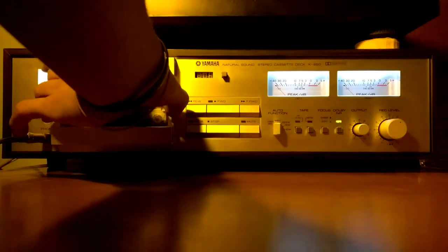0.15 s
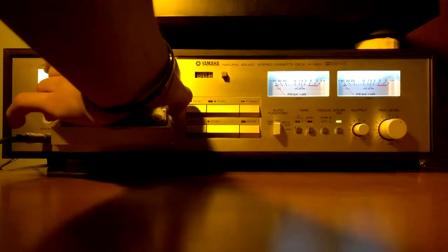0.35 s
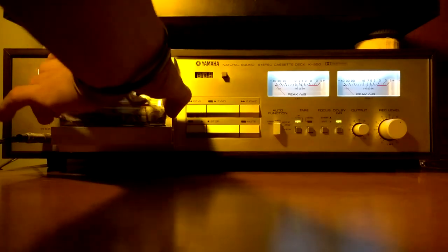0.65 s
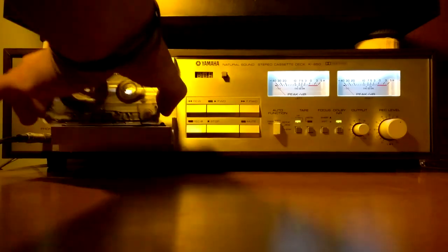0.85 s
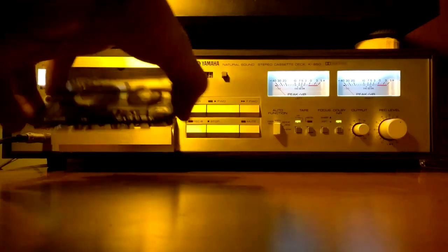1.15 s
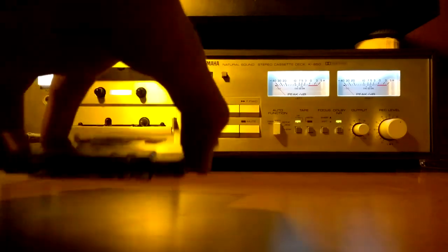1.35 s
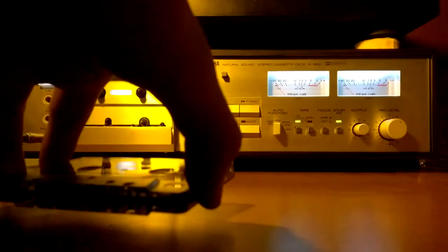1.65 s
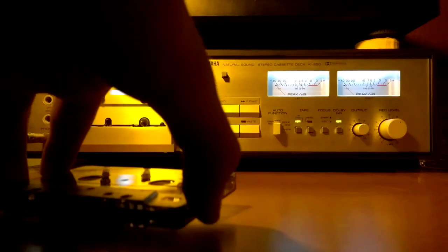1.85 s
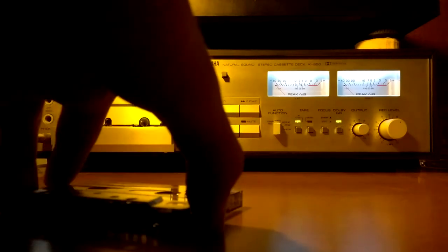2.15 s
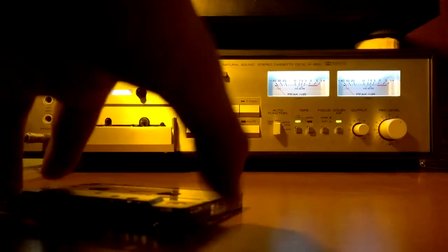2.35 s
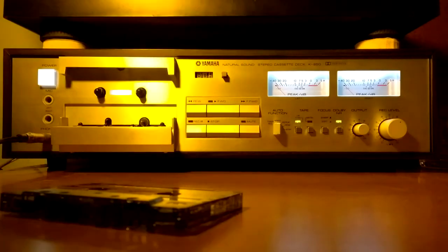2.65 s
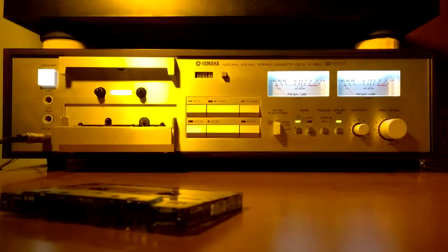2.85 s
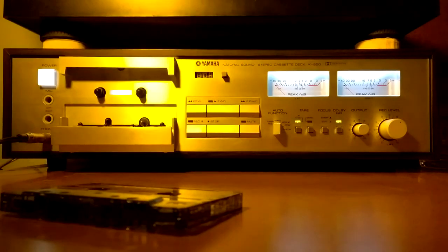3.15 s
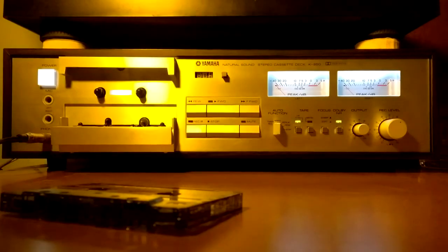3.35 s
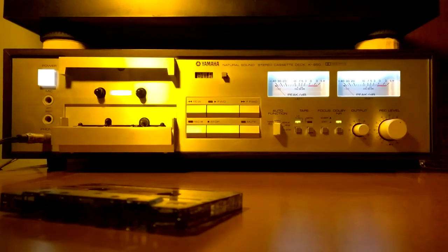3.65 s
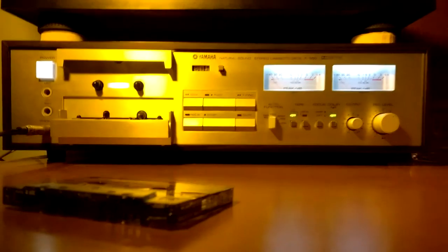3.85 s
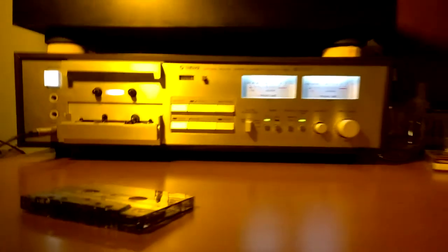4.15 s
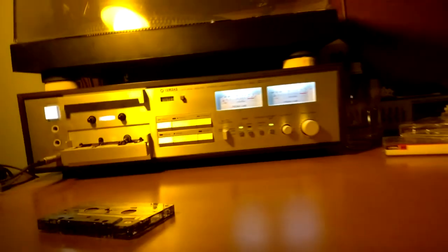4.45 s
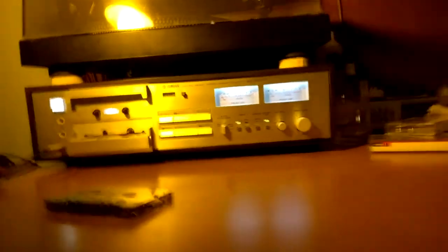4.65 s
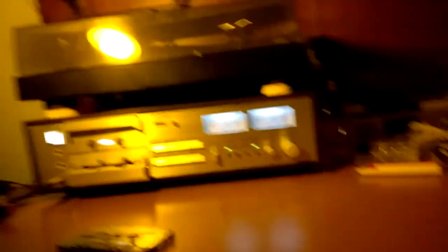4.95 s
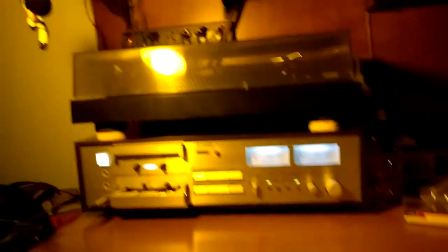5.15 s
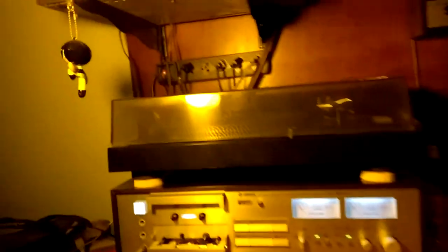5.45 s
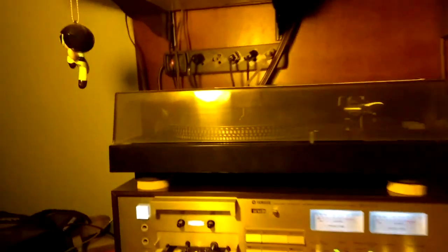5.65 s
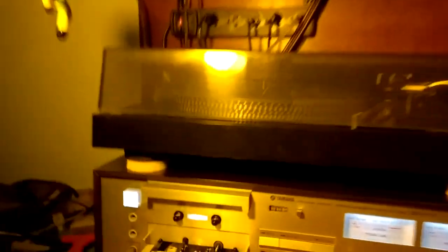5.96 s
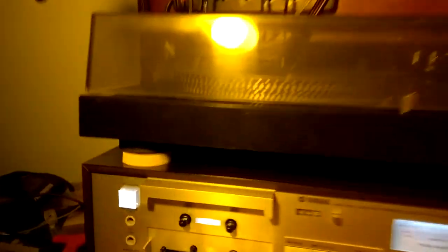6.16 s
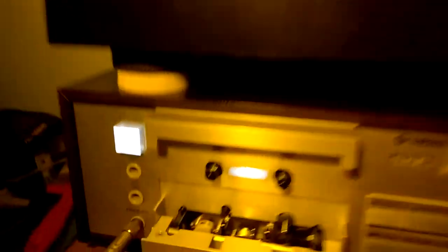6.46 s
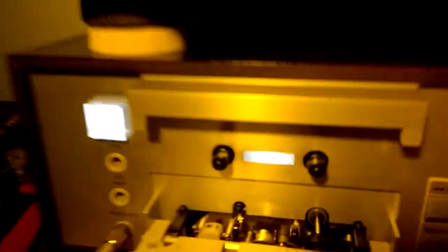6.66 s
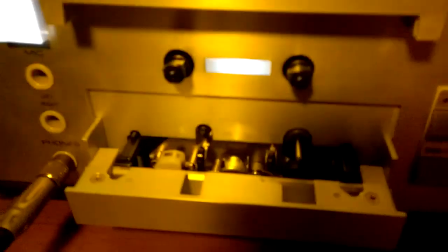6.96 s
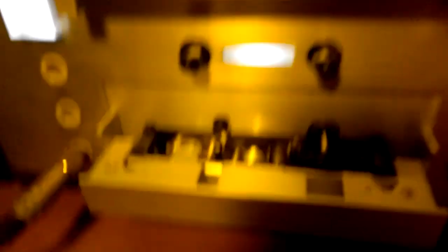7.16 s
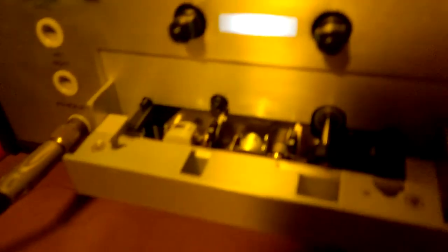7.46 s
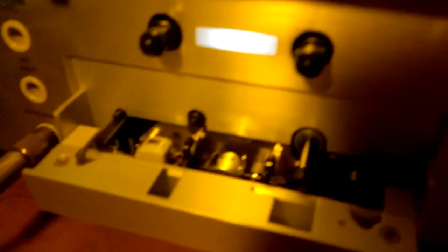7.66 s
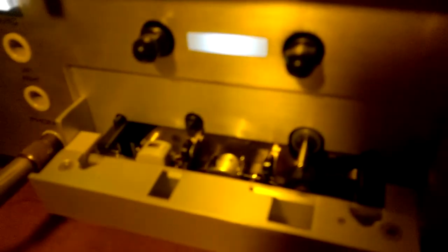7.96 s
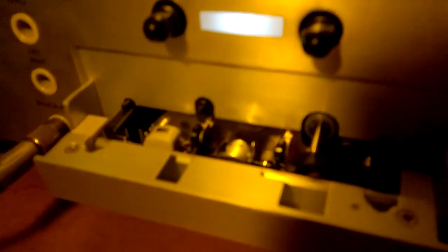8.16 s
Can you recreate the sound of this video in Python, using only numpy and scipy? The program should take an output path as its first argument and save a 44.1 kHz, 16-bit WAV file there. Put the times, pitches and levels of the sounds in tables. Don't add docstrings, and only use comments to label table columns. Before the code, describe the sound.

In a quiet small room, a plastic cassette clicks, scrapes and rattles out of a tape deck, then lands softly on a wooden table. A low engine drones faintly outside, quickens and disappears. Then fingers handle the recording phone: bassy thumps, dry rubs, sharp case cracks and one short squeak, very close and almost entirely in the right channel, fading to faint rustle.

```python
import sys
import numpy as np
from scipy import signal
from scipy.io import wavfile

SR = 44100
rng = np.random.default_rng(int(sys.argv[2]) if len(sys.argv) > 2 else 0)


def master(y):
    cut = np.clip(np.atleast_2d(y).T, -1, 1)
    pcm = np.round(cut * 32767)
    wavfile.write(sys.argv[1], SR, pcm.astype(np.int16))


def attenuation_scalar(level_db):
    decades = np.asarray(level_db, float) / 20
    return 10 ** decades


N = 365721


def rms_one(x):
    return x / np.sqrt(np.mean(x ** 2) + 1e-20)


def peak_one(x):
    return x / np.abs(x).max()


def add(out, start_s, x):
    at = round(start_s * SR)
    out[..., at:at + x.shape[-1]] += x[..., :N - at]


def in_time(rows, edge_db=None):
    time_s, *columns = np.transpose(rows)
    return [np.interp(np.arange(N) / SR, time_s, c, edge_db, edge_db) for c in columns]


def band(x, low_hz, high_hz, order=2):
    edges_hz = [low_hz, min(high_hz, .45 * SR)]
    return signal.sosfilt(signal.butter(order, edges_hz, "band", fs=SR, output="sos"), x)


def drift(rate_hz):
    r = np.exp(-2 * np.pi * rate_hz / SR)
    settle = SR // 4
    white = rng.standard_normal(N + settle)
    return rms_one(signal.lfilter([1], [1, -2 * r, r * r], white)[settle:])


def ring(x, hz, t60_s):
    r = attenuation_scalar(-60 / (max(t60_s, .002) * SR))
    w = 2 * np.pi * hz / SR
    return signal.lfilter([0, np.sin(w)], [1, -2 * r * np.cos(w), r * r], x + 1e-18)


def body(x, modes, spread_db=0):
    lucky_db = spread_db * rng.standard_normal(len(modes))
    out = 0
    for k, (hz, width_hz, db) in enumerate(modes):
        t60_s = np.log(1000) / np.pi / width_hz
        out = out + (-1) ** k * attenuation_scalar(db + lucky_db[k]) * ring(x, hz, t60_s)
    return out


def grains(shape, per_s, spread_db):
    sizes = attenuation_scalar(spread_db * np.minimum(rng.exponential(1, shape), 4)) * rng.choice([-1, 1], shape)
    return sizes * (rng.random(shape) < per_s / SR)


def gestures(start_s, hold_s, db, rise_db_per_s, fall_db_per_s):
    t = np.arange(0, N / SR + .002, .001)
    start_s, hold_s = start_s[:, None], hold_s[:, None]
    away_db = np.maximum(rise_db_per_s * (start_s - t), fall_db_per_s * (t - start_s - hold_s))
    return attenuation_scalar(db[:, None] - np.clip(away_db, 0, 200))


def per_sample(slow):
    return np.interp(np.arange(N) / SR * 1000, np.arange(len(slow)), slow)


def together(rows):
    return per_sample(np.sqrt(np.sum(rows ** 2, axis=0)))


def two_ports(right, other, left_db, alike=.7):
    alike = np.clip(alike, 0, 1)
    late = np.roll(right, 20, axis=-1)
    left = alike * late + np.sqrt(1 - alike ** 2) * other
    return 2 * np.array([left * attenuation_scalar(left_db), right]) / np.sqrt(1 + attenuation_scalar(left_db) ** 2)


# pitch_hz, level_db (per Hz)
ROOM_TONE = [(20, -8.5), (48, -5), (154, -26.5), (698, -33.5), (1370, -47.5), (5850, -50.5), (8410, -60.5),
             (15000, -52.5)]
# pitch_hz, likeness (0 to 1)
LIKENESS = [(60, 0.82), (300, 0.023), (650, 0.18), (3000, 0.018)]


def room_tone():
    out = 0
    edges_hz = 18 * 2 ** np.arange(0, 10.5, .5)
    white = rng.standard_normal((2, 2, N))
    for k, (low_hz, high_hz) in enumerate(zip(edges_hz, edges_hz[1:])):
        mid, side = band(white[k % 2], low_hz, high_hz)
        at = np.log(low_hz * high_hz) / 2
        level_db, alike = (np.interp(at, np.log(np.array(p)[:, 0]), np.array(p)[:, 1])
                           for p in (ROOM_TONE, LIKENESS))
        alike = np.clip(alike, -1, 1)
        out = out + attenuation_scalar(level_db) * (np.sqrt(1 + alike) * mid + np.sqrt(1 - alike) * side * [[1], [-1]])
    return attenuation_scalar(-56) * rms_one(out)


# time_s, firing_hz
ENGINE = [
    (0.0, 48.96),
    (1.1, 53.24),
    (2.2, 57.53),
    (3.4, 60.16),
]
# start_s, hold_s, level_db
FIRING_BOOMS = [
    (0.0, 0.15, -51.5),
    (.42, 0.7, -34.5),
    (1.45, 0.844, -52.5),
    (2.82, 0.23, -50),
]
# start_s, hold_s, level_db
SECOND_BOOMS = [
    (0.0, 1.6, -59.5),
    (1.17, 1.233, -57.5),
]
# start_s, hold_s, level_db
HALF_BOOMS = [
    (.95, 0.53, -50.5),
    (2.2, 0.54, -57),
]


def engine():
    firing_hz, = in_time(ENGINE)
    firing, second, half = (together(gestures(*np.transpose(booms), 92.5, 92.5))
                            for booms in (FIRING_BOOMS, SECOND_BOOMS, HALF_BOOMS))
    turn = 2 * np.pi * np.cumsum(firing_hz * (1 + 0.0012 * drift(11.0))) / SR
    leaving = np.interp(np.arange(N) / SR, [3.2, 3.45], [1, 0])
    white = rng.standard_normal(N)
    out = attenuation_scalar(-67.0) * rms_one(band(white, 35, 140.0))
    out = out + attenuation_scalar(-31.5) * firing * rms_one(band(white, 200, 300))
    for order, gain in [(1, firing), (2, second), (.5, half), (4, second / 10), (5, second / 10)]:
        out = out + np.sqrt(2) * gain * attenuation_scalar(0.5 * drift(12.0)) * np.sin(order * turn)
    return leaving * out


# pitch_hz, level_db
SHELL = [(2300, -6), (2850, -5.5), (3600, -1), (4150, 1.5), (4600, 0), (5600, -2), (6500, 1.5),
         (7150, -0.5), (8400, -4.5), (9500, -4.5), (11000, -8), (13000, -14)]


def shell(contact):
    detune = attenuation_scalar(.25 * rng.standard_normal(len(SHELL)))
    mix = attenuation_scalar(2.5 * rng.standard_normal((len(SHELL), 2, 1)))
    mix[:, 1] *= np.sign(np.roll(detune, 1) - 1)[:, None]
    return sum((-1) ** k * attenuation_scalar(db) * mix[k] * ring(contact, hz * detune[k], 13.0 / hz)
               for k, (hz, db) in enumerate(SHELL))


def cassette_hit(below, hz, bright_db, low_db):
    t = np.arange(SR // 7) / SR
    force = (1 - np.exp(-(t + 0.00011) / 0.00062)) * (np.exp(-t / 0.003) + 0.07 * np.exp(-t / 0.025))
    contact = grains(len(t), 3500, 3.5) * force
    contact[12] = 1.3
    main = ring(contact, hz, 0.016)
    main = main + 0.9 * ring(contact, 1.17 * hz, .01) - .6 * ring(contact, .88 * hz, 0.01)
    strength, detune = attenuation_scalar([[2.5], [.25]] * rng.standard_normal((2, len(below))))
    low = sum(g * ring(contact, f * d, t60_s) for g, d, (f, t60_s) in zip(strength, detune, below))
    bright = peak_one(shell(contact)) * attenuation_scalar([[0], [2.0]])
    return peak_one(main) + attenuation_scalar(bright_db) * bright + attenuation_scalar(low_db) * peak_one(low)


# start_s, peak_db, shell_hz, bright_db, low_db (last two against the peak)
PULL = [(0.0553, -37.5, 1620, 5, -3.5), (0.2253, -49.5, 1770, 4.5, -7), (0.2885, -40.5, 1250, -9, -8.5),
        (0.3277, -33.5, 1450, -24, -13), (0.342, -35, 1481, -24.5, -14), (0.3657, -42, 1440, 3, -12),
        (0.3826, -31, 1540, -4, -14.5), (0.394, -26, 1500, -14, -19), (0.3986, -19, 1355, -44.5, -15.5),
        (0.4012, -17.5, 1420, 5, -14.5), (0.41, -38.5, 1500, 4, 1), (0.418, -30, 1330, 2.5, 4.5),
        (0.4817, -17, 1390, 0, -12.5), (0.4862, -17, 1770, -7, -11.5), (0.4885, -15, 1660, -1.5, -15.5),
        (0.4945, -28.5, 1780, -14, 3.5), (0.5035, -24, 1500, -5, 1), (0.5108, -37, 1600, -22.5, -5),
        (0.5328, -35.5, 1700, 2, -14.5), (0.539, -35.5, 1920, 1.5, -9.5), (0.5847, -35, 1790, -19.5, -21),
        (0.5897, -24, 1440, 3, -8), (0.5955, -20, 1660, 4.5, -9), (0.6, -26, 1880, 2, -2.5),
        (0.606, -19.5, 1470, -15, -29), (0.624, -37.5, 1580, 1.5, -11), (0.723, -25.5, 1600, -21, -21.5),
        (0.7274, -17.5, 1564, -2.5, -23), (0.733, -31, 1670, -7, -5), (0.7593, -24, 1620, -3.5, -6),
        (0.7655, -24.5, 1750, -9, -9.5), (0.782, -44, 1600, -12, 5), (0.8021, -49, 1800, -25, 7.5),
        (0.822, -41.5, 1600, -29.5, 2)]
# start_s, peak_db, shell_hz, bright_db, low_db
LAY = [
    (1.9084, -50, 1450, 0.5, 7.5),
    (1.9126, -55, 1570, -6.5, -13),
    (1.9812, -44, 1500, 3, 2),
    (2.0278, -56, 1420, 2, 12),
]
# start_s, peak_db, shell_hz, bright_db, low_db
DROP = [
    (2.2232, -32, 1350, 1, 1.7),
    (2.243, -49, 1329, -11, 7.6),
]
# pitch_hz, t60_s
DRAWER = [(150, .04), (205, .1), (300, .06), (400, .05), (500, .045), (650, .04), (950, .025)]
# pitch_hz, t60_s
TABLE_TOP = [(280, 0.03), (345, .07), (385, .1), (520, 0.06), (625, .04), (870, .03)]
# pitch_hz, t60_s
FLAT = [(385, .09), (520, .05), (625, .07), (870, .05), (1000, .05), (1430, .07), (2270, .045)]
# time_s, level_db
SLIDE = [
    (.31, -60),
    (.34, -45),
    (.47, -59),
    (.5, -42),
    (.58, -46),
    (.62, -38),
    (.71, -55.5),
    (.77, -34.5),
    (.9, -81),
]


def cassette():
    out = np.zeros((2, N))
    for hits, below in (PULL, DRAWER), (LAY, TABLE_TOP), (DROP, FLAT):
        for start_s, peak_db, *colour in hits:
            add(out, start_s, attenuation_scalar(peak_db) * cassette_hit(below, *colour))
    grit = grains((2, SR), 3000, 2.7) * attenuation_scalar(1.3 * drift(40.0))[:SR]
    guides = [(1400, 0.004), (1620, 0.0068), (1880, 0.002)]  # Hz, t60 s
    tone = sum(ring(grit[0] + 0.28 * grit, hz, t60_s) for hz, t60_s in guides)
    tone = tone + 54.0 * band(grit[0], 240, 1000)
    level = attenuation_scalar(in_time(SLIDE, -140)[0][:SR])
    add(out, 0, level * rms_one(tone + attenuation_scalar(-6.5) * shell(grit[1])))
    return out


def room(x):
    t, t60_s = np.arange(SR // 2) / SR, 0.24
    white = rng.standard_normal((2, len(t))) * (t > .004)
    tail = band(white, 210, 1900) * attenuation_scalar(-60 * t / t60_s)
    tail = tail + 1.08 * band(white, 1500, 10000) * attenuation_scalar(-75 * t / t60_s)
    return signal.fftconvolve(x, tail / np.sqrt(np.sum(tail ** 2) / 2), axes=1)[:, :N]


# start_s, hold_s, level_db
GRIP = [(3.237, 0.14, -52.5), (3.314, 4.83, -54), (3.458, 0.0075, -45), (3.712, 0.013, -40),
        (3.856, 0.0047, -32.5), (4.032, .01, -34.5), (4.242, 0.17, -31.5), (4.578, 0.032, -24),
        (4.758, 0.017, -33), (4.846, 0.24, -43), (5.191, 0.18, -42), (5.485, 0.25, -40), (5.852, 0.19, -44),
        (6.117, 0.38, -32.5), (6.387, 0.064, -22.5), (6.571, 0.016, -24), (6.744, 0.077, -25.5),
        (7.006, 0.3, -35.5), (7.362, 0.24, -33), (7.652, 0.11, -80), (7.997, .02, -57.5)]
# start_s, peak_db, swing_hz, t60_s
PUSH = [(3.491, -28, 29.1, 0.097), (3.72, -22.5, 24, 0.24), (3.859, -16.5, 32.3, 0.19),
        (4.239, -22.5, 157, 0.032), (4.599, -8, 70, 0.037), (4.607, -4.5, 33, 0.11), (5.257, -22, 31, 0.19),
        (6.35, -14, 45.4, 0.055), (6.574, -34.5, 28.4, 0.13), (6.773, -5, 43, 0.12),
        (7.071, -13.5, 43.1, 0.028), (7.22, -21, 38.2, 0.055)]
PUSH_SIGN = [1, 1, 1, 1, -1, 1, 1, 1, 1, 1, 1, 1]


def grip():
    white = rng.standard_normal((2, N))
    press = together(gestures(*np.transpose(GRIP), 284.5, 256))
    hard = np.clip(press / attenuation_scalar(-35.0), .15, 1)
    quick = .75 * rms_one(band(white, 58, 120)) + .2 * rms_one(band(white, 140, 240))
    lumps = rms_one(band(white, 22, 60)) + hard * quick
    right, other = press * attenuation_scalar(3.0 * drift(15.0) - 2.5) * lumps
    t = np.arange(SR // 4) / SR
    for (start_s, peak_db, hz, t60_s), sign in zip(PUSH, PUSH_SIGN):
        swing = np.sin(2 * np.pi * hz * t) * attenuation_scalar(-60 * t / t60_s)
        add(right, start_s, sign * attenuation_scalar(peak_db) * peak_one(swing))
    return two_ports(right, other, -33.5, alike=0.35)


# start_s, peak_db, bright_db, low_db (last two against the peak)
TICK = [(3.87, -36, -31, 1.5), (4.028, -38, 3, -35), (4.3653, -41, 2.5, 7.5), (4.582, -34, 3, -21),
        (4.591, -25, 2.5, 0), (4.612, -15.5, -13, 0), (4.7174, -48.5, -23, 15.5), (5.119, -56, 9, -20),
        (5.2666, -37.5, -11, 5.5), (6.5642, -32, -14.5, 0.5), (7.068, -48.5, -17, 18),
        (4.778, -31, -47, 5.5), (5.035, -16, -59, -16), (5.3446, -19.5, -54, -5), (5.5656, -13, -7, -9),
        (6.2238, -42.5, -15.5, 13.5), (6.35, -15.5, -21.5, 5), (6.3837, -29.5, -31.5, 8.5),
        (6.4086, -13.5, -29.5, 6.5), (6.4201, -2.5, -13.5, -10.5), (6.5316, -27, -30, 2),
        (6.6977, -46, -17, -7.5), (6.773, -21.5, -4, 14), (6.777, -22, 16.5, -23.5)]
# start_s, peak_db, bright_db, low_db
TICK_LEFT_HAND = [
    (3.467, -57.5, -24, 4),
    (3.6854, -49, -23, -4),
    (3.829, -50, -3, -13.5),
    (5.2433, -66, -30, 27),
    (5.489, -59, 18, -11),
    (6.8081, -19.5, -10, 4),
    (7.568, -67.5, -18, 29),
    (7.6209, -49, -30, 7),
]
# pitch_hz, width_hz, level_db
CASE = [(1004, 260, 0.5), (1596, 300, 6.5), (2074, 210, 1.5), (2800, 330, 4), (3850, 330, -3)]
# pitch_hz, width_hz, level_db
CASE_TOP = [(4480, 850, -3), (4954, 310, 0), (5930, 1200, 5), (8000, 170, -20.5), (8100, 1800, -7.5)]
# pitch_hz, width_hz, level_db
CASE_LOW = [(300, 860, 10.5), (620, 170, -1), (800, 750, -8)]


def ticks():
    out, t = np.zeros((2, N)), np.arange(SR // 20) / SR
    for table, left_db in (TICK, -40.5), (TICK_LEFT_HAND, -7):
        for start_s, peak_db, bright_db, low_db in table:
            contact = .6 * grains(len(t), 6000, 3.0) * np.exp(-t / .001)
            contact[0] = -1.5
            contact = band(contact, 60, 6500, order=3)
            crack = peak_one(body(contact, CASE, 1.5) + attenuation_scalar(14.0) * band(contact, 800, 4000))
            crack += attenuation_scalar(bright_db) * peak_one(body(contact, CASE_TOP, 2.5))
            box = peak_one(body(contact, CASE_LOW, 2.5))
            right = np.pad(crack + attenuation_scalar(low_db) * box, (0, 40))
            left = np.pad(crack + .8 * peak_one(ring(contact, 660, .016)), (20, 20))
            add(out, start_s, attenuation_scalar(peak_db) * two_ports(right, left, left_db, alike=0))
    return out


# start_s, length_s, rub_db, pitch_hz, scrape_db (against the rub)
SLIDES = [(6.402, 0.065, -13, 340, -7), (3.692, .025, -38, 600, -8), (3.716, .042, -30, 760, -16.5),
          (3.866, .018, -36.5, 450, -10.5), (3.75, 4.2, -72, 300, -2), (5.728, 1.185, -57, 300, -3),
          (7.68, .11, -65, 240, -2), (3.83, .012, -46, 500, -6), (3.893, .024, -40.5, 450, -9.5),
          (4.045, .08, -43, 470, -8.5), (4.078, 0.43, -43, 360, -17.5), (4.198, 0.048, -46.5, 450, -12),
          (4.302, 0.041, -37.5, 480, -8.5), (4.364, 0.048, -37.5, 490, -9), (4.411, 0.05, -46, 480, -8),
          (4.752, 0.028, -43.5, 560, -8.5), (4.539, 0.27, -43.5, 424, -8), (4.765, 0.022, -24, 570, -24),
          (4.964, 0.17, -32.5, 766, -19.5), (5.121, 0.17, -50.5, 470, -1.5), (5.267, 0.02, -29.5, 620, -13),
          (5.18, 0.019, -43, 700, -15), (5.21, 0.018, -32.5, 720, -15), (5.25, 0.011, -49, 650, -20),
          (4.713, 0.011, -35, 516, -27), (4.63, .065, -33, 620, -16.5), (6.774, 0.022, -12.5, 550, -8.5),
          (6.815, 0.048, -30, 550, -7.5), (5.51, 0.067, -58.5, 613, 4), (5.847, 0.092, -52, 477, -4.5),
          (6.111, 0.22, -32.5, 377, -13), (6.142, 0.043, -37, 446, -2.5), (6.464, 0.76, -39.5, 402, -9.5),
          (6.551, 0.041, -23, 337, -16.5), (6.591, 0.052, -22.5, 558, -19.5), (6.717, 0.1, -24, 400, -19),
          (7.019, 0.15, -33, 450, -11), (7.071, 0.0095, -8.5, 287, -51), (7.166, .53, -57.5, 227, -3.5),
          (7.463, 0.14, -35.5, 195, -36)]
# start_s, length_s, rub_db, pitch_hz, scrape_db (against the rub)
RASPS = [
    (4, 0.02, -43, 580, -4),
    (4.021, 0.013, -25.5, 675, -8.5),
    (4.59, 0.03, -28, 556, -5.5),
    (5.57, 0.011, -51.5, 326, -43),
    (6.326, 0.069, -26.5, 702, -8.5),
    (6.353, 0.005, -25.5, 377.6, -17),
    (6.381, 0.03, -20.5, 510, -7),
    (5.075, 0.008, -42, 704, -11.5),
    (6.755, 0.031, -32, 446, -4.5),
    (6.789, 0.017, -19.5, 513, -7.5),
]
# start_s, length_s, hiss_db, other_hand_db
SWEEPS = [(3.687, 0.06, -51.5, -35), (3.769, 3.1, -79, -66.5), (4.215, 0.22, -68, -58),
          (4.548, .14, -63.5, -44.5), (4.952, 0.3, -68, -45.5), (5.273, 0.021, -62.5, -51),
          (5.496, 0.067, -70, -52), (5.85, 0.1, -68, -58.5), (6.338, 0.035, -51, -71.5),
          (6.557, 0.034, -48.5, -74.5), (6.756, 0.083, -48, -65), (6.831, 0.047, -54, -33),
          (6.876, 0.035, -62, -52), (7.014, 0.14, -51, -47.5), (7.165, 0.55, -77.5, -55.5)]


def skin():
    touch_db_per_s, stop_db_per_s, lead_s = 4001, 4003.5, 0.0041
    rubs, scrapes = [], []
    for table, rub_fall, scrape_fall in (SLIDES, stop_db_per_s, stop_db_per_s), (RASPS, 272.5, 399.5):
        start_s, hold_s, rub_db, _, scrape_db = np.transpose(table)
        rubs.append(gestures(start_s - lead_s, hold_s, rub_db, touch_db_per_s, rub_fall))
        scrapes.append(gestures(start_s - lead_s, hold_s, rub_db + scrape_db, touch_db_per_s, scrape_fall))
    rubs, scrape = np.vstack(rubs), together(np.vstack(scrapes))
    stroke_hz = np.vstack([SLIDES, RASPS])[:, 3]
    pitch_hz = per_sample(stroke_hz @ rubs ** 2 / np.sum(rubs ** 2, axis=0))
    start_s, hold_s, *levels_db = np.transpose(SWEEPS)
    hiss, left = (together(gestures(start_s - lead_s, hold_s, db, touch_db_per_s, stop_db_per_s))
                  for db in levels_db)
    hiss = np.hypot(hiss, attenuation_scalar(-23.5) * scrape)
    return together(rubs), scrape, hiss, left, pitch_hz


def hand_hollow(contact, pitch_hz):
    modes_hz = np.geomspace(140, 1300, 9)
    weights = [attenuation_scalar(-6.5 * np.log2(hz / pitch_hz) ** 2) for hz in modes_hz]
    rings = [rms_one(ring(contact, hz, 5.91 / hz)) * (-1) ** k for k, hz in enumerate(modes_hz)]
    return sum(w * r for w, r in zip(weights, rings)) / np.sqrt(sum(w ** 2 for w in weights))


def shifting_body(x, modes):
    return sum((-1) ** k * attenuation_scalar(2.5 * drift(4.0)) * body(x, [mode]) for k, mode in enumerate(modes))


def through_case(right):
    late = np.roll(right, 20)
    return attenuation_scalar(-19.5) * ring(late, 590, 0.0092) * 0.011 + attenuation_scalar(-49.5) * band(late, 900, 9000)


def rub():
    hollow, scrape, hiss, left, pitch_hz = skin()
    left = np.sqrt(np.maximum(left ** 2 - attenuation_scalar(-76.5) ** 2, 0))
    patchy = attenuation_scalar(2.2 * drift(50.0) + 1.2 * drift(10.0))
    coarse = grains(N, 1500, 4.0) * patchy
    fine = grains((2, N), 3500, 3.6) * patchy
    case = rms_one(band(shifting_body(fine, CASE), 650, 4400))
    top = rms_one(band(shifting_body(fine, CASE_TOP), 2500, 4500))
    light = np.clip(.5 * (300 / pitch_hz) ** 1.2, .1, .9)
    right = hollow * hand_hollow(coarse, pitch_hz)
    right = right + scrape * (np.sqrt(1 - light ** 2) * case[0] + light * top[0])
    airy = (hiss / attenuation_scalar(-47.0)) ** 0.79 * band(fine[0], 8700, 15000)
    right = right + hiss * rms_one(band(fine[0], 6800, 10000) + airy)
    own = 0.33 * case[1] + 0.44 * top[1]
    own = own + 1.3 * rms_one(band(fine[1], 530, 850)) + 0.071 * rms_one(band(fine[1], 6500, 13000))
    return np.array([through_case(right) + attenuation_scalar(-11.0) * left * own, right])


# time_s, slips_hz, level_db
SQUEAK = [
    (6.575, 302, -32),
    (6.6, 406, -29),
    (6.627, 520, -13.5),
    (6.64, 480, -45),
    (6.649, 460, -58),
]


def squeak():
    slips_hz, level_db = in_time(SQUEAK)[0], in_time(SQUEAK, -140)[1]
    turn = 2 * np.pi * np.cumsum(slips_hz * (1 + .07 * drift(90.0))) / SR
    stack = np.sin(turn)
    for k in range(2, 5):
        stack = stack + k ** -2.6 * attenuation_scalar(4.0 * drift(150.0)) * np.sin(k * turn)
    out = attenuation_scalar(level_db + 2.7 * drift(120.0)) * stack
    return two_ports(out, out, -46, alike=0.48)


def scene():
    steady = room_tone() + engine() + grip() + squeak()
    hand = ticks() + rub()
    table = cassette()
    return table + attenuation_scalar(-8.5) * room(table) + attenuation_scalar(-37.0) * room(hand[[1, 1]]) + hand + steady


def top_cut(x):
    return signal.sosfilt(signal.butter(12, 15900, fs=SR, output="sos"), x)


def record(dry):
    heard = signal.sosfilt(signal.butter(1, 10000, fs=SR, output="sos"), dry)
    heard = signal.sosfilt(signal.cheby2(14, 60, 16300, fs=SR, output="sos"), heard)
    return top_cut(np.tanh(heard * 0.82) / 1.135)


dry = scene()
out = record(dry)
master(out)
```